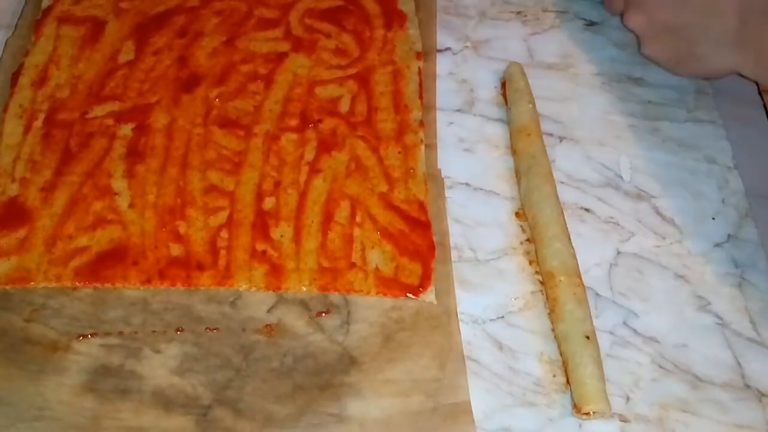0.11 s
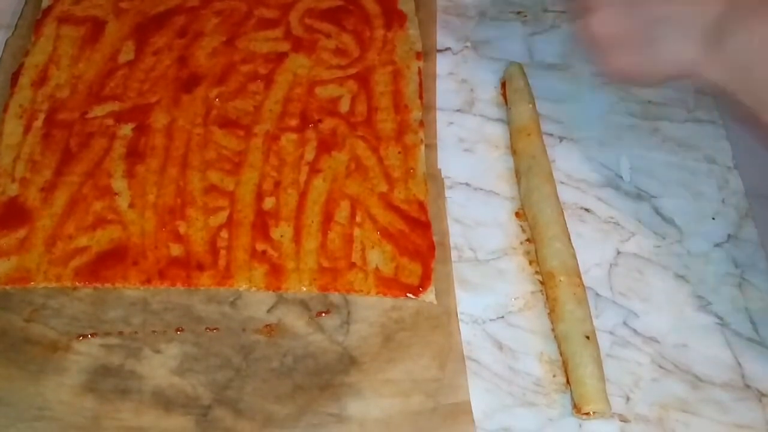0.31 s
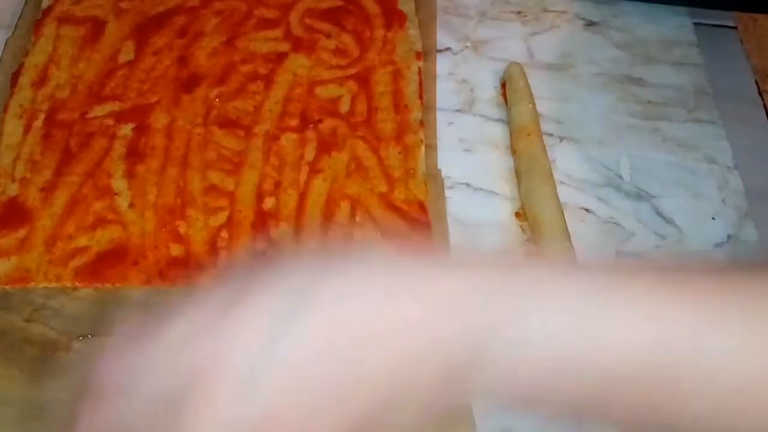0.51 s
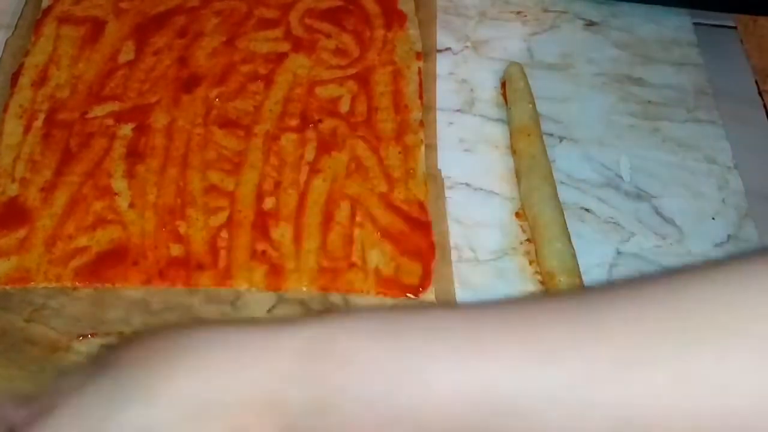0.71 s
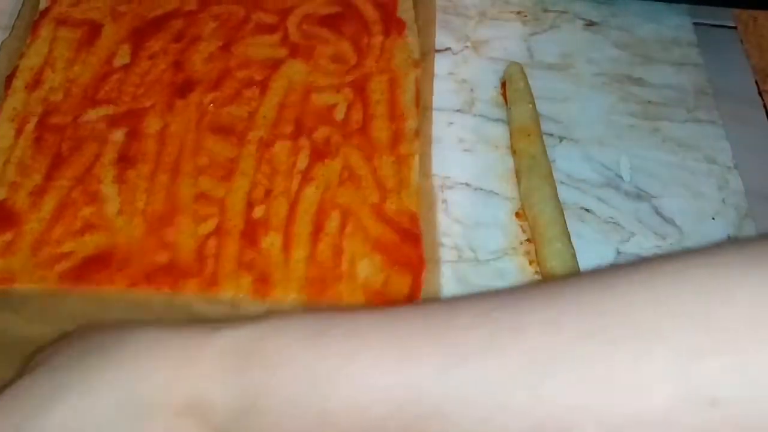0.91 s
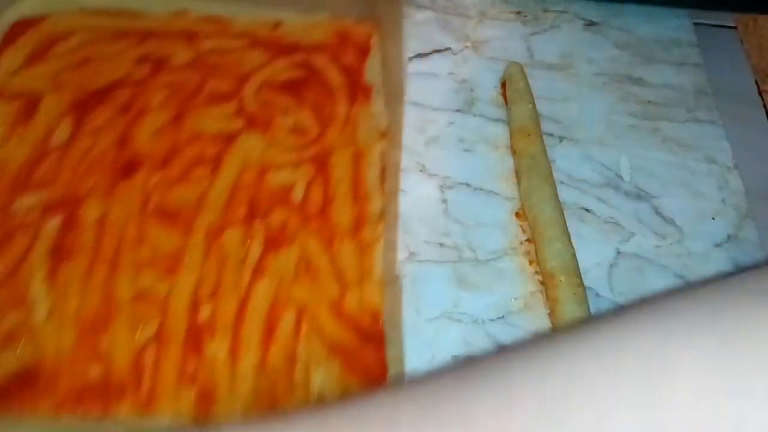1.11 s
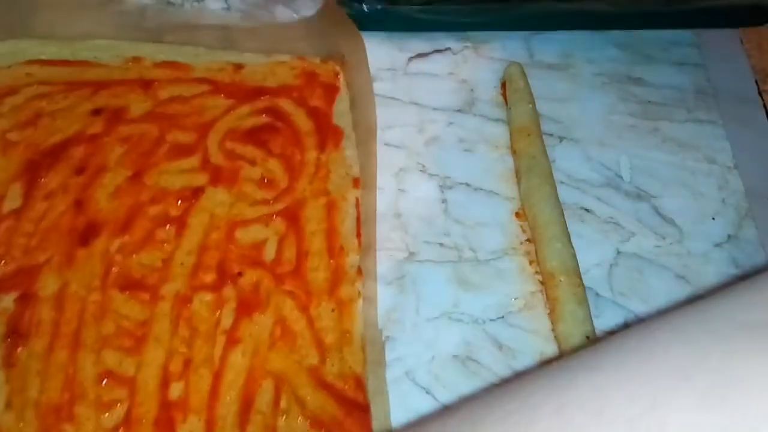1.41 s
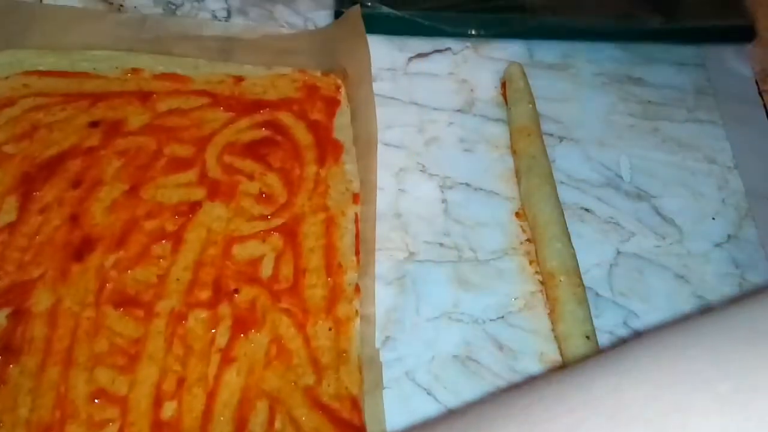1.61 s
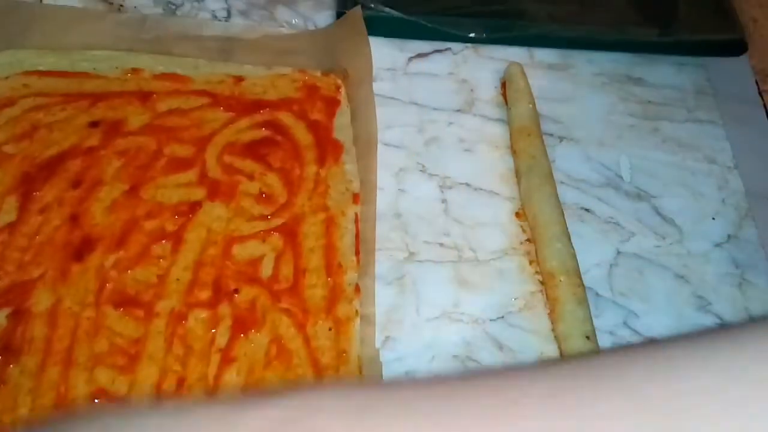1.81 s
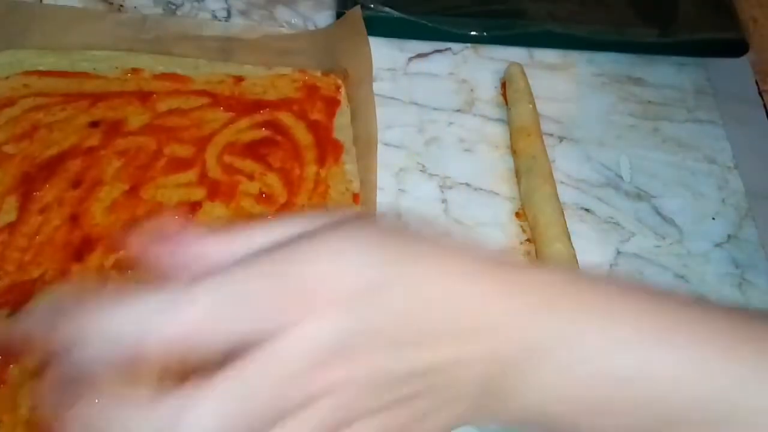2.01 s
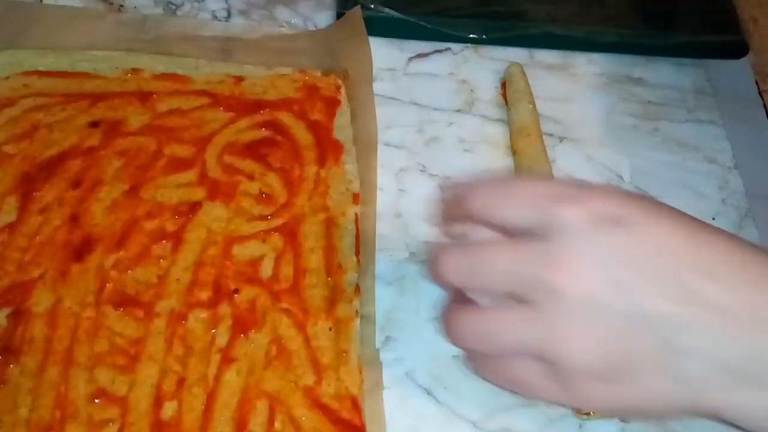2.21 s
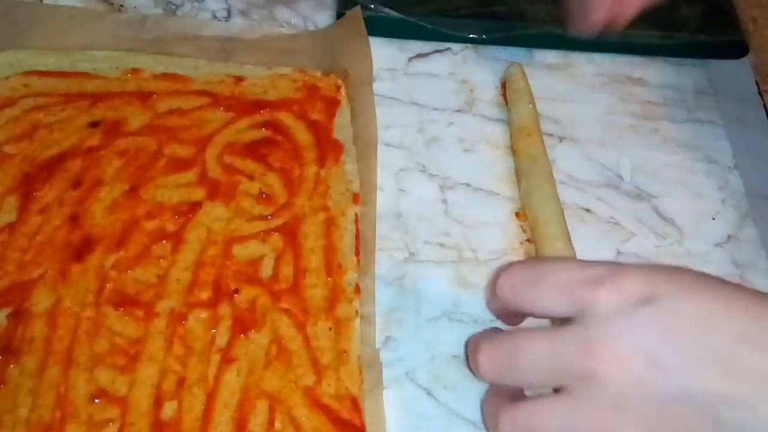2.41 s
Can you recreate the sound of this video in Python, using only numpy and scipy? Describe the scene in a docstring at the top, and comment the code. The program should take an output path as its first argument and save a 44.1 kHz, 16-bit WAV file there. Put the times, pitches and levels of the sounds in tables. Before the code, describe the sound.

Close up in a reverberant kitchen, faint paper rustle and one loud knock on stone with a low boom, then louder paper crinkling and dragging, dull tray clatter, near quiet, and a faint far clink.

```python
"""A hard object knocks on a stone counter in a live kitchen: quick contacts ring its modes, the counter booms.
Hands drag baking paper, faintly before and around the knock and louder after it: it crackles (bursts of
coloured noise) and slides (grainy noise), onto a tray that clacks (blows and rattle on its modes) and thuds
on the counter (low tones with rough noise). At the end something small clinks further away, nearly all room.
The room, decaying noise, rings about half a second; a faint earlier bump is still fading in it, over a
steady noise floor."""
import sys
import numpy as np
from scipy import signal
from scipy.fft import rfft, irfft, next_fast_len
from scipy.io import wavfile
from scipy.ndimage import uniform_filter1d, map_coordinates

SR = 44100
rng = np.random.default_rng(int(sys.argv[2]) if len(sys.argv) > 2 else 0)


def invert_db(x):
    """Field ratio 10**(x/20) for x, a level in decibels (scalar or array-like)."""
    u = np.asarray(x, float) / 20
    return 10 ** u


def put_to_file(sound):
    """Save the sound as 16-bit audio at rate SR, in the file named by the first command-line argument."""
    columns = np.atleast_2d(sound).T  # one column per channel
    safe = np.clip(columns, -1, 1)
    whole_steps = np.round(safe * 32767)
    wavfile.write(sys.argv[1], SR, whole_steps.astype(np.int16))


N = 114660  # length [samples]


def unit(x):
    """Scales x to rms 1."""
    return x / np.sqrt(np.mean(x ** 2) + 1e-20)


def along(points, hz):
    """Reads a curve of (frequency [Hz], value) points on a log frequency axis."""
    f, v = np.transpose(points)
    return np.interp(np.log(hz + 1), np.log(f + 1), v)


def coloured(x, gain):
    """Filters x with a zero-phase gain, a function of frequency."""
    m = next_fast_len(len(x) + 4096)
    return irfft(rfft(x, m) * gain(np.fft.rfftfreq(m, 1 / SR)), m)[:len(x)]


def eq(x, curve):
    """Filters x with an EQ curve of (frequency [Hz], gain [dB]) points."""
    return coloured(x, lambda hz: invert_db(along(curve, hz)))


def add(track, s, x):
    """Mixes x into the track from time s [s] on."""
    i = round(s * SR)
    x = x[max(-i, 0):][:N - max(i, 0)]
    track[max(i, 0):][:len(x)] += x


def ring(modes, t, scatter_db):
    """Sums exponentially decaying modes with new levels and phases for each blow, peak 1."""
    x = np.zeros(len(t))
    for hz, db, t60 in modes:
        envelope = invert_db(db + scatter_db * rng.normal() - 60 * t / t60)
        x += envelope * np.sin(2 * np.pi * (hz * t + rng.random()))
    x = x * (1 - np.exp(-t / 0.00005))
    return x / np.abs(x).max()


# knocks on the stone: (time [s], level of the blow [dB], level of the room's answer [dB])
KNOCKS = [(0.2386, -5, -28)]
# contacts within one knock: (delay [s], level relative to the blow [dB])
BOUNCES = [(0, -4), (.0025, -4.5), (.0048, -1.5), (.0085, -4)]
# modes of the hard object: (frequency [Hz], level before scatter [dB], decay t60 [s])
OBJECT = [(1540, -12, 0.026), (1996, 3.5, 0.015), (2225, -7, 0.031), (2873, -3, 0.013), (3320, 3.5, 0.007),
          (3693, -1.5, 0.018), (4224, -17.5, 0.01), (5200, -12.5, 0.016), (6520, -5.5, 0.016),
          (7250, -13.5, 0.022)]
# EQ of the room's answer to a knock: (frequency [Hz], gain [dB])
KNOCK_TAIL = [(110, -55), (189, -8), (262, -17), (480, -8), (553, -9), (803, -7), (1340, -9), (2190, -9.5),
              (4860, -14.5), (6430, -9), (8920, -26), (16000, -49.5)]
# low rings of the counter under a knock: (frequency [Hz], level [dB], decay t60 [s], swell time constant [s])
COUNTER = [(98.8, -16, 0.35, 0.13), (204, -33.5, 0.41, 0.01), (390, -52.5, 0.97, 0.034),
           (592, -37.5, 0.53, .005), (809, -34.5, 0.53, 0.033)]


def knocks():
    """Quick contacts excite the object's modes and a crack of noise; the counter booms and the room answers."""
    out, t, long = np.zeros(N), np.arange(SR // 20) / SR, np.arange(SR * 3 // 4) / SR
    crack_gain, crack_t60_s = 0.5 * invert_db(-0.5), 0.0055
    ring_in_tail_db, ring_width_hz = 3, 35

    def crack_colour(hz):
        return invert_db(along(KNOCK_TAIL, hz)) * np.clip(hz / 700 - 1.2, 0, 1)  # low cut

    def answer_colour(hz):
        # the object's first seven modes stand out in the room
        peaks = sum(1 / (1 + ((hz - mode_hz) / ring_width_hz) ** 2) for mode_hz, _, _ in OBJECT[:7])
        return invert_db(along(KNOCK_TAIL, hz)) * (1 + invert_db(ring_in_tail_db) * peaks)

    for s, db, room_db in KNOCKS:
        for delay, loss_db in BOUNCES:
            noise = unit(coloured(rng.standard_normal(len(t)), crack_colour))
            crack = crack_gain * invert_db(-60 * t / crack_t60_s) * noise * (1 - np.exp(-t / .0003))
            add(out, s + delay, invert_db(db + loss_db) * (ring(OBJECT, t, 3) + crack))
        answer = coloured(tail(ROOM_FILL_S), answer_colour)
        add(out, s + .002, invert_db(room_db) * answer / np.std(answer[:SR // 10]))
        for hz, boom_db, t60, swell_s in COUNTER:
            pair = ring([(hz, 0, t60), (hz * 1.03, -9, t60)], long, 1)  # close pair that beats
            add(out, s, invert_db(boom_db) * pair * (1 - np.exp(-long / swell_s)) ** 2)
    return out


# paper crackles: (time [s], peak level [dB], centre frequency [Hz], decay t60 [s])
CRACKLES = [(0.14, -42, 7100, 0.046), (0.19, -44, 6900, 0.27), (0.6857, -49, 5500, 0.05),
            (0.6954, -33, 7770, 0.13), (0.7531, -35, 5950, 0.025), (0.7604, -31, 5850, 0.087),
            (0.7816, -34.5, 3350, 0.17), (0.7868, -31, 6200, 0.056), (0.7979, -25, 6100, 0.081),
            (0.82, -29, 6500, 0.02), (0.8416, -31, 3120, 0.047), (0.8774, -27.5, 5740, 0.021),
            (0.9588, -38.5, 7500, 0.036), (1.037, -33, 4120, 0.057), (1.1156, -29.5, 5240, 0.04),
            (1.1294, -35, 2360, 0.045), (1.1644, -32, 2260, 0.08), (1.2391, -35.5, 6500, 0.11),
            (1.32, -35, 2720, 0.034), (1.3478, -28, 6000, 0.034), (1.371, -52, 6500, 0.021),
            (1.3931, -30.5, 2220, 0.27), (1.402, -31.5, 2420, 0.18), (1.4123, -25.5, 6800, 0.036),
            (1.4305, -18, 6430, 0.066), (1.4384, -25.5, 6600, 0.015), (1.504, -37, 6400, 0.016),
            (1.5496, -40, 6800, 0.028), (1.5754, -35, 7300, 0.13), (1.5879, -30.5, 5800, 0.074),
            (1.6036, -41, 7300, 0.028), (1.7474, -28, 5600, 0.047), (1.753, -31, 2160, 0.092),
            (1.7887, -27.5, 2350, 0.084), (1.938, -32.5, 4440, 0.061), (2.0374, -44, 3100, 0.056),
            (2.047, -48, 8100, 0.12)]
# EQ shared by the crackles: (frequency [Hz], twice the gain [dB])
PAPER = [(300, -26.5), (800, 2.5), (1780, 12), (4340, 7), (6440, 13), (10700, -16), (13400, -30.5),
         (15000, -17), (16400, 0)]


def crackles():
    """Each crease snaps as a short burst of paper noise around its own centre."""
    out, t = np.zeros(N), np.arange(SR // 10) / SR
    slope_octaves, slope_db = 0.63, -6  # fall per this many octaves off centre, at most four times

    for s, db, centre_hz, t60 in CRACKLES:
        def colour(hz):
            off_centre = np.abs(np.log2((hz + 1) / centre_hz)) / slope_octaves
            return invert_db(along(PAPER, hz) / 2 + slope_db * np.minimum(off_centre, 4))

        decay = invert_db(-60 * t / t60) + 0.53 * invert_db(-60 * t / 0.02)
        attack = 1 - np.exp(-t / 0.00026)
        burst = unit(coloured(rng.standard_normal(len(t)), colour)) * decay * attack
        add(out, s, invert_db(db) * burst / np.abs(burst).max())
    return out


# level rides of the sliding paper, before flutter:
# (time [s], hiss level [dB], lower scrape level [dB], top treble level [dB])
SLIDE = [(0, -54.5, -94, -76.5), (.1, -58.5, -69, -76), (.22, -60, -68.5, -68), (.3, -57, -104, -60),
         (.45, -72, -61, -88), (0.682, -79.5, -82, -94), (0.699, -75, -83, -70), (0.751, -61, -97, -82),
         (.79, -49, -55.5, -63), (.9, -51, -60.5, -70.5), (1.0, -53, -71, -66), (1.11, -51, -77, -70),
         (1.118, -48.5, -61, -62), (1.2, -45.5, -54, -60), (1.335, -50, -56.5, -75),
         (1.421, -44.5, -50.5, -63), (1.53, -59, -55, -75.5), (1.6, -55, -48.5, -61), (1.68, -54, -69, -72),
         (1.756, -48.5, -51.5, -65), (1.85, -69, -55.5, -87.5), (1.961, -62.5, -49, -88),
         (2.03, -70, -62, -93), (2.098, -84, -69, -92), (2.2, -78.5, -82, -87), (2.6, -83.5, -76.5, -84.5)]
# EQ of the hiss: (frequency [Hz], gain [dB])
HISS = [(590, -39), (1000, -20.5), (1960, -1.5), (2780, -2), (3910, -1.5), (4410, -6), (6460, 3),
        (11000, -19.5), (14300, -53)]
# EQ of the lower scrape: (frequency [Hz], gain [dB])
SCRAPE = [(150, -62), (250, -1), (566, -6.5), (763, -1), (1090, -1), (3500, -11.5), (4550, -51.5),
          (7700, -120)]
# EQ of the top treble: (frequency [Hz], gain [dB])
AIR = [(5290, -29.5), (9000, -7.5), (13400, -9.5), (15500, 6.5), (16000, -13.5), (16400, -57)]


def slide():
    """Paper dragged over stone: fine random grains on noise, in three colours with fluttering levels."""
    s, *levels_db = np.transpose(SLIDE)
    out, t = np.zeros(N), np.arange(N) / SR
    grains_per_s, grain_spread_db, grain_cap_db, grain_share = 500, 7, 12, 0.35
    for level_db, colour in zip(levels_db, (HISS, SCRAPE, AIR)):
        size_db = np.minimum(grain_spread_db * rng.exponential(size=N), grain_cap_db)
        grains = (rng.random(N) < grains_per_s / SR) * invert_db(size_db) * rng.choice([-1, 1], N)
        mix = grain_share * unit(grains) + (1 - grain_share) * rng.standard_normal(N)
        flutter_db = 1.5 * map_coordinates(rng.standard_normal(200), [t * 60])  # 60 random points a second
        out += invert_db(np.interp(t, s, level_db) + flutter_db) * unit(eq(mix, colour))
    return out


# tray clacks: (time [s], peak level [dB], boost of the upper modes [dB])
# hard contacts ring the upper modes, soft ones hardly
CLACKS = [(1.123, -42.5, 9), (1.237, -43, -1), (1.35, -34.5, -2.5), (1.392, -31, -1.5), (1.414, -32, 2.5),
          (1.5125, -33, 12), (1.517, -30, -3.5), (1.588, -38, -9), (1.702, -30, 5), (1.72, -31, -2),
          (1.73, -33, -8), (1.789, -34, -5), (1.81, -31, -3), (1.829, -21.5, -1), (1.842, -24.5, -2),
          (1.851, -34, -10), (1.867, -29, -2), (1.885, -35, -21), (1.939, -31.5, 1.5), (1.962, -37.5, -3.5),
          (2.039, -40, -11.5), (2.061, -44, -15)]
# modes of the tray: (frequency before detune [Hz], level before boost and scatter [dB], decay t60 [s])
TRAY = [(208, -15.5, 0.08), (604, -1.5, 0.066), (683, -12, 0.019), (771, 0.5, 0.044), (799, 2.5, 0.082),
        (833, 0, 0.16), (1064, -11, 0.12), (1188, -10.5, 0.21), (1332, -3.5, 0.12), (1501, 0.5, 0.053),
        (1698, -5, 0.094), (1890, -0.5, 0.06), (2106, -6, 0.06), (2440, -14, 0.028), (3350, -4, .03),
        (3630, -8, 0.045), (3964, -6, 0.025)]


def tray_clacks():
    """A blow and a short noise rattle ring the tray's modes, a little shifted for each blow."""
    out, t = np.zeros(N), np.arange(SR // 4) / SR
    detune, upper_hz = 0.04, 1000  # detune: rms share of each mode's frequency
    rattle_db, rattle_t60_s, contact_s = -23.5, 0.023, 0.00033
    for s, db, upper_db in CLACKS:
        drive = invert_db(rattle_db - 60 * t[:SR // 20] / rattle_t60_s) * rng.standard_normal(SR // 20)
        drive[0] = 1  # the blow itself
        modes = [(hz * (1 + detune * rng.normal()), mode_db + upper_db * (hz > upper_hz), t60)
                 for hz, mode_db, t60 in TRAY]
        x = signal.fftconvolve(drive, ring(modes, t, 3))
        x = x * (1 - np.exp(-np.arange(len(x)) / SR / contact_s))
        add(out, s, invert_db(db) * x / np.abs(x).max())
    return out


# thuds of the tray through the counter: (time [s], level [dB], frequency [Hz], decay t60 [s])
THUDS = [(0.798, -53, 150, 0.15), (1.236, -44, 161, 0.21), (1.289, -45, 108, 0.11), (1.35, -42, 154, 0.36),
         (1.355, -45, 101, 0.098), (1.476, -50, 99, 0.19), (1.519, -51.5, 104.6, 0.4),
         (1.613, -44, 158.9, 0.63), (1.63, -35, 107, 0.063), (1.697, -50, 100, 0.28),
         (1.817, -41, 124, 0.14), (1.853, -42.5, 81.3, 0.22), (1.964, -42, 111, 0.11),
         (2.05, -52, 94.4, 0.13)]


def tray_thuds():
    """The tray rumbles through the counter: a low decaying tone with a rough noise band around it."""
    out, t = np.zeros(N), np.arange(SR // 2) / SR
    width, broad_db, attack_s = 0.12, -8.5, 0.0059  # width: band half-width over centre frequency

    for s, db, hz, t60 in THUDS:
        def band(f):
            narrow = 1 / (1 + ((f - hz) / (width * hz)) ** 2)
            broad = invert_db(broad_db) / (1 + (f / (6.0 * hz)) ** 4) * (f > 35)
            return narrow + broad

        rough = unit(coloured(rng.standard_normal(len(t)), band)) * invert_db(-60 * t / t60)
        thud = ring([(hz, 0, t60)], t, 0) + 0.51 * rough
        add(out, s, invert_db(db) * thud * (1 - np.exp(-t / attack_s)))
    return out


# far clinks: (time [s], level of the room's answer [dB])
CLINKS = [(2.262, -70), (2.278, -61)]
# EQ of the clinks: (frequency [Hz], gain [dB])
CLINK = [(710, -60), (1300, -17), (2000, -9), (2640, -9.5), (3150, 1), (3800, -9), (4400, -8), (4800, 0),
         (5300, -5), (6200, -0.5), (7200, -4.5), (8680, -25), (13000, -69)]


def clinks():
    """Far away, so a faint tick and mostly the room's answer arrive."""
    out = np.zeros(N)
    tick_decay = invert_db(7 - 60 * np.arange(2000) / SR / 0.028)  # starts at +7 dB, t60 0.028 s
    for s, db in CLINKS:
        x = eq(tail(0.00617, stretch=1.6), CLINK)
        x = x / np.std(x[:SR // 10])
        add(out, s, invert_db(db) * x)
        add(out, s, invert_db(db) * tick_decay * x[2000:4000])  # tick cut from later in the same noise
    return out


# decay of the kitchen: (frequency [Hz], t60 before any stretch [s])
ROOM = [(60, 0.48), (200, 0.54), (500, 0.36), (1100, 0.43), (3000, 0.47), (7000, 0.43), (12000, 0.22)]
ROOM_FILL_S = 0.022  # time constant of the build-up


def tail(fill_s, stretch=1):
    """A room answer: noise that fills up, then dies band by band, scaled to energy 1."""
    hz, t, z = signal.stft(rng.standard_normal(SR * 3 // 4), SR, nperseg=256)
    t60 = along(ROOM, hz)[:, None] * stretch
    x = signal.istft(z * invert_db(-60 * t / t60), SR, nperseg=256)[1]
    x = x * (1 - np.exp(-np.arange(len(x)) / SR / fill_s))
    return x / np.linalg.norm(x)


def room(x):
    """The kitchen's reverb on x, drawn anew every fifth of a second."""
    out, step = np.zeros(N), SR // 5
    for i in range(0, N, step):
        add(out, i / SR, signal.fftconvolve(x[i:i + step], tail(ROOM_FILL_S)))
    return out


# EQ of the fading bump: (frequency [Hz], gain [dB])
FADING = [(40, -25.5), (93, -2), (240, -6), (442, -21.5), (635, -2), (796, -2.5), (912, -10), (1680, -11.5),
          (2590, -22.5), (2830, -9.5), (4990, -21.5), (6410, -16), (9000, -26), (11700, -56)]


def fading():
    """The room still carries an earlier bump: a room answer heard from 0.08 s after its start."""
    x = eq(tail(ROOM_FILL_S), FADING)[round(0.08 * SR):]
    return np.pad(invert_db(-48) * x / np.std(x[:SR // 20]), (0, N))[:N]


# EQ of the noise floor: (frequency [Hz], gain [dB])
FLOOR = [(15, -35), (25, -4.5), (146, 4.5), (272, -3.5), (567, -4), (723, -7), (1350, -27.5), (2030, -20),
         (3890, -14.5), (8320, -35.5), (15100, -22.5), (16400, -46.5)]


def noise_floor():
    """Steady coloured noise at -71 dB rms under everything."""
    return invert_db(-71) * unit(eq(rng.standard_normal(N), FLOOR))


# moments when the treble spreads left and right: (start [s], end [s], side level before the treble cut [dB])
SPREADS = [(.235, 0.244, -3.5), (0.685, 0.696, -9), (0.786, 0.818, 0), (1.195, 1.226, -9),
           (1.4, 1.432, -15), (1.578, 1.606, -4), (1.925, 1.954, -2)]


def treble_spread(mid):
    """Side signal: the treble of the mid, delayed 1/700 s, opened briefly."""
    t, wide_hz = np.arange(N) / SR, 4600
    gates = sum(invert_db(db) * (t > start) * (t < end) for start, end, db in SPREADS)

    def treble(hz):
        return np.clip((hz - wide_hz) / 300, 0, 1) * invert_db(-hz / 2000)  # falls 1 dB per 2 kHz

    return uniform_filter1d(gates, size=200) * coloured(np.roll(mid, SR // 700), treble)


def scene():
    """Mixes all sources in the middle, with their reverb, and spreads the treble at moments."""
    snaps, clacks, thuds = crackles(), tray_clacks(), tray_thuds()
    dull_clacks = coloured(clacks, lambda hz: 1 / np.hypot(1, hz / 1800))  # the far sound of the tray is dull
    wet = room(invert_db(-10.5) * snaps + invert_db(-6) * dull_clacks + invert_db(-13.5) * thuds)
    mid = knocks() + snaps + slide() + clacks + thuds + clinks() + wet + fading() + noise_floor()
    side = treble_spread(mid)
    return np.array([mid + side, mid - side])


def band_limit(x):
    """A steep low-pass at the top of the band."""
    return signal.sosfilt(signal.butter(12, 16670, fs=SR, output="sos"), x)


def record(dry):
    """Band-limits both channels, fading out the last 300 Hz below the top."""
    top_hz = 15850
    mix = np.array([coloured(channel, lambda hz: np.clip((top_hz - hz) / 300, 0, 1)) for channel in dry])
    return band_limit(mix)


dry = scene()
out = record(dry)
put_to_file(out)
```